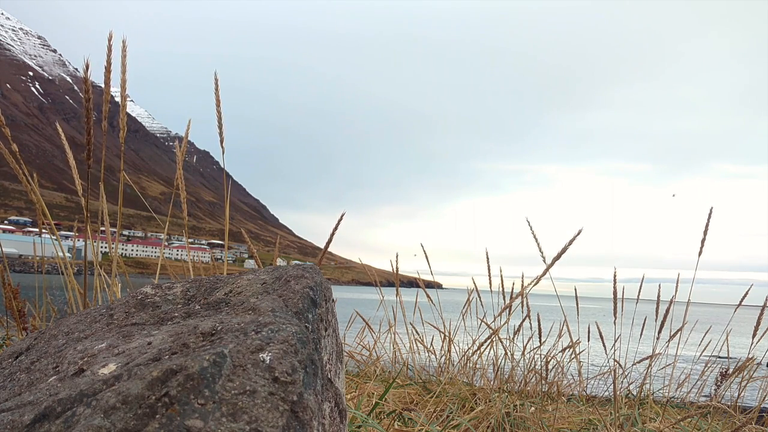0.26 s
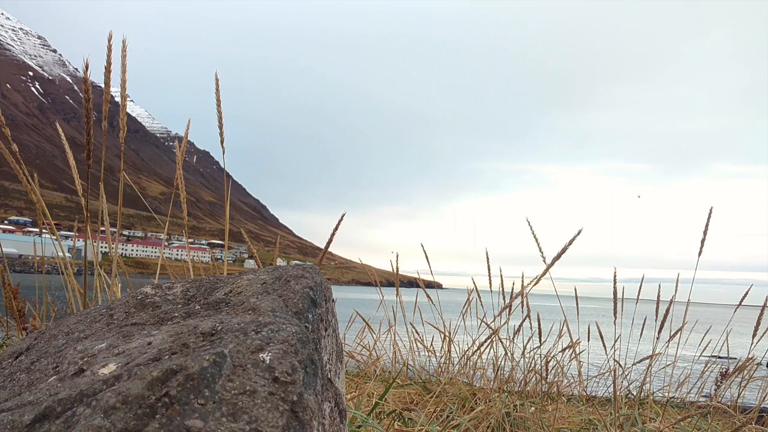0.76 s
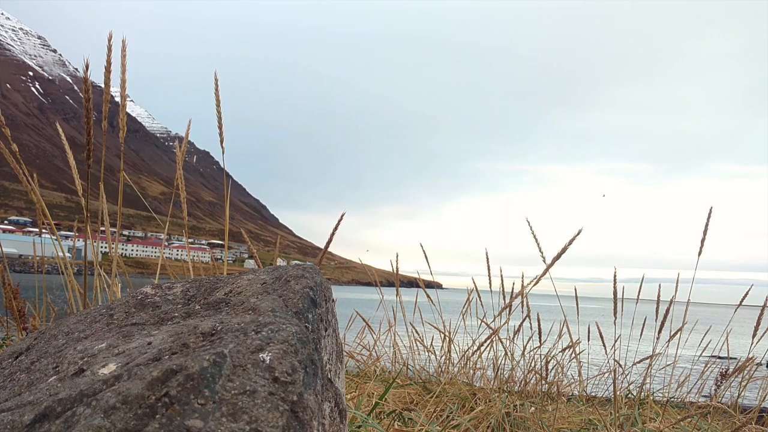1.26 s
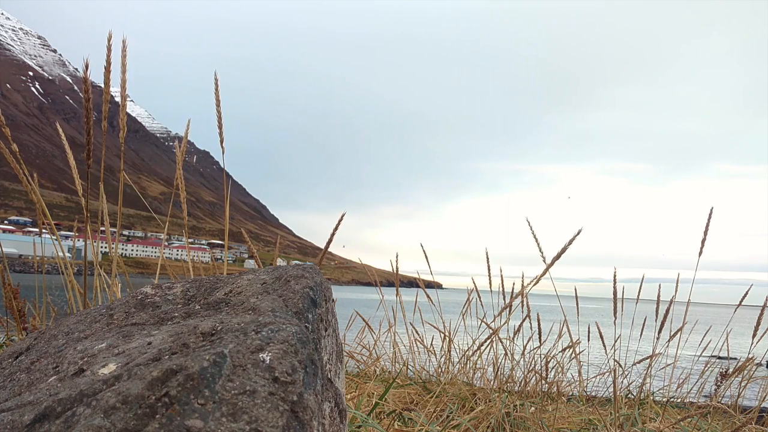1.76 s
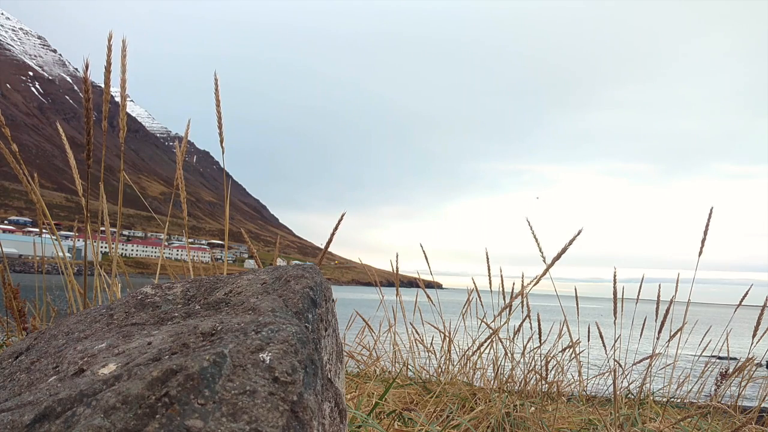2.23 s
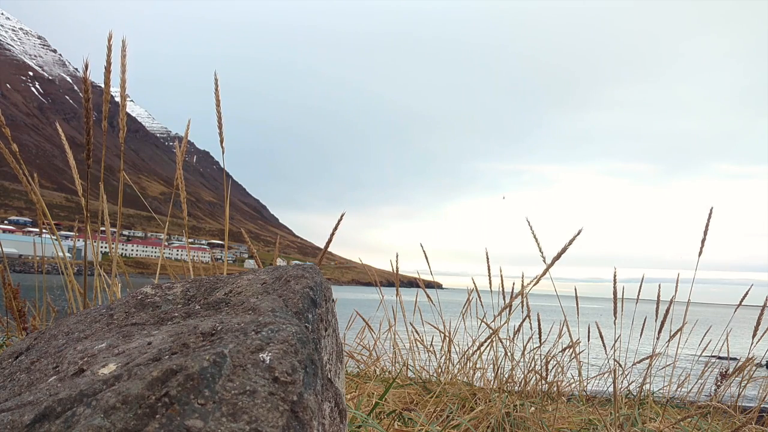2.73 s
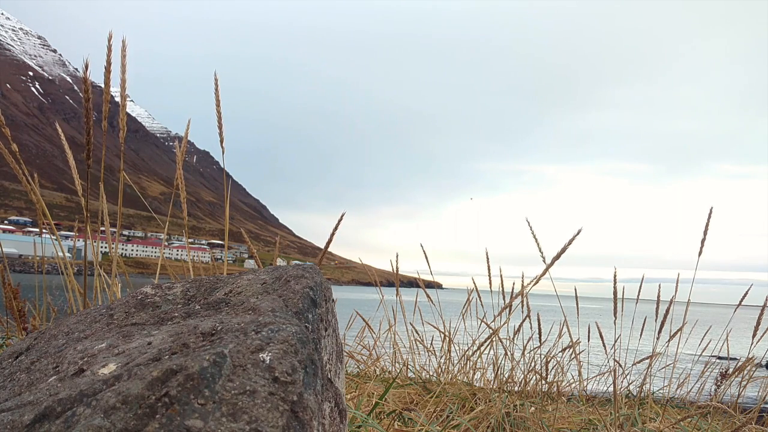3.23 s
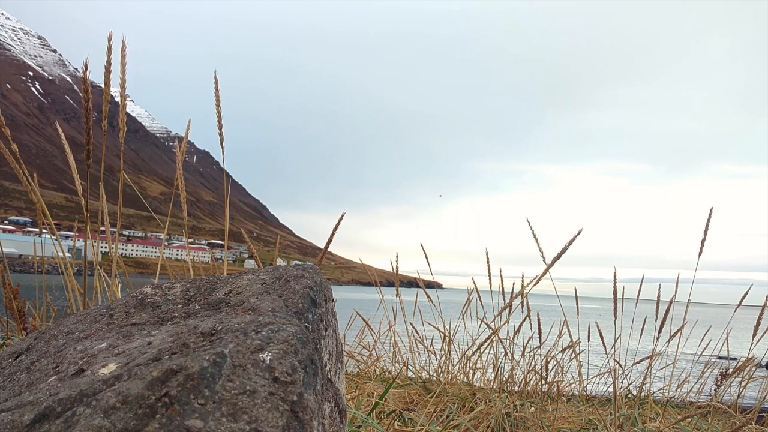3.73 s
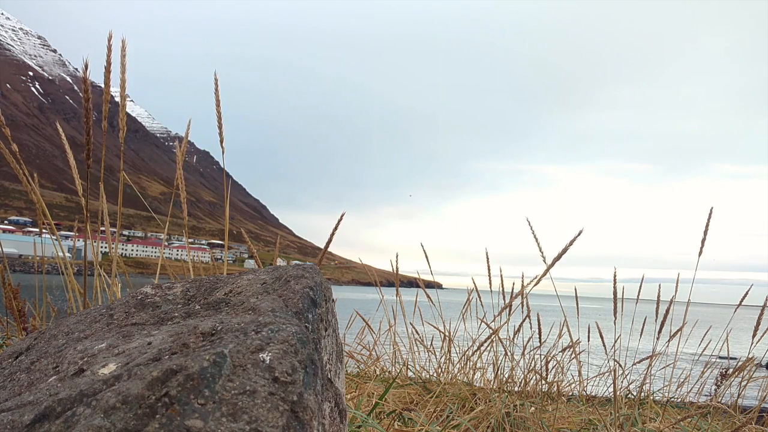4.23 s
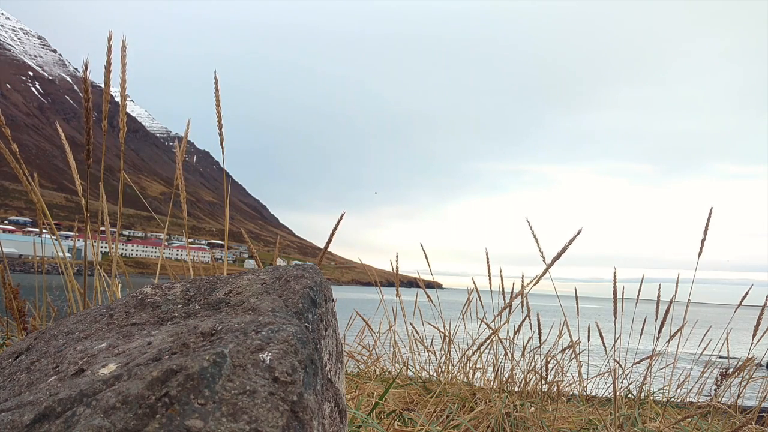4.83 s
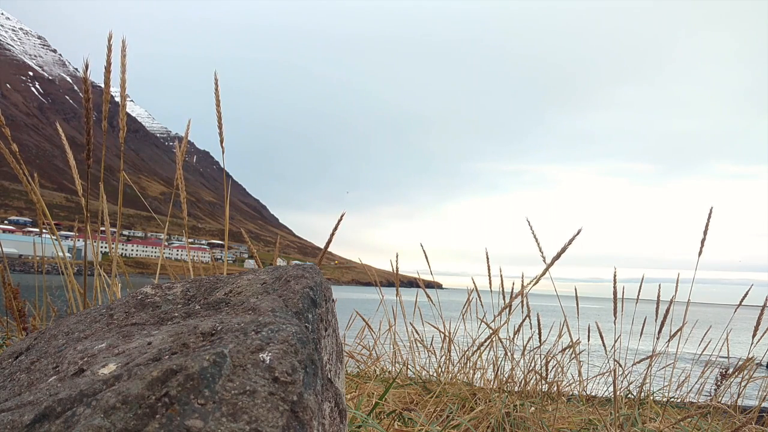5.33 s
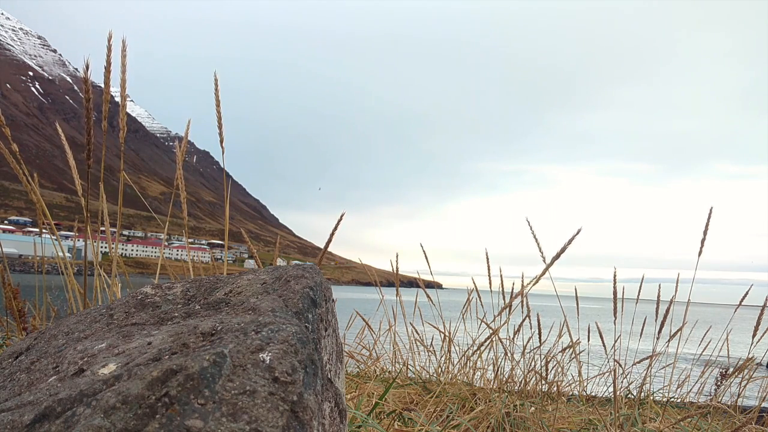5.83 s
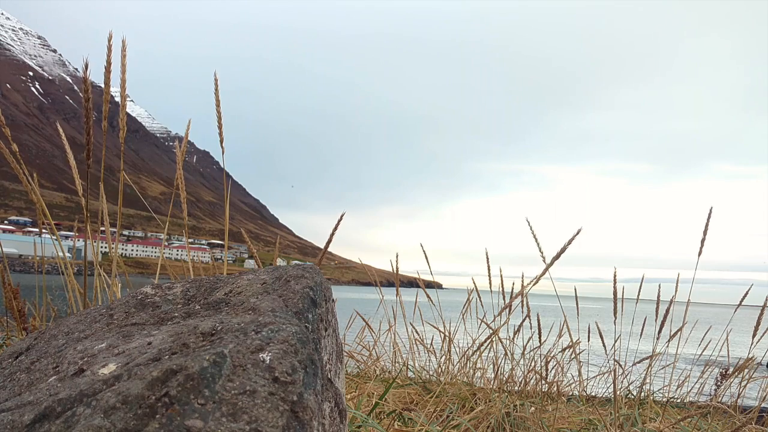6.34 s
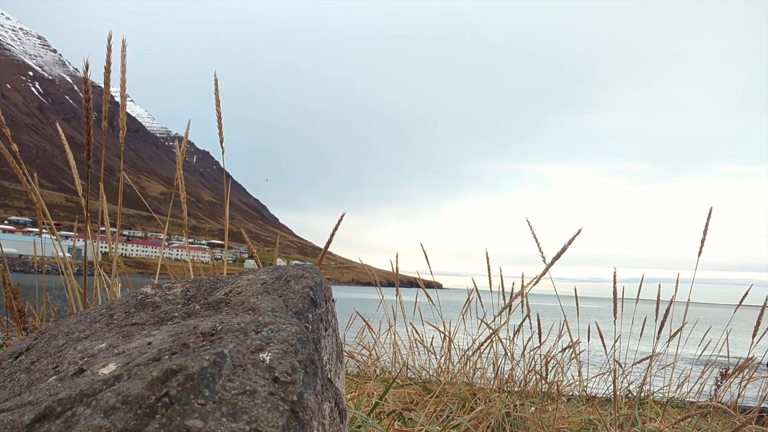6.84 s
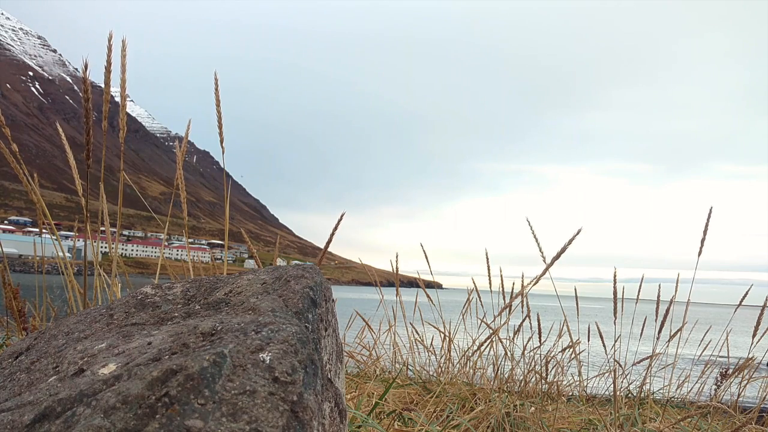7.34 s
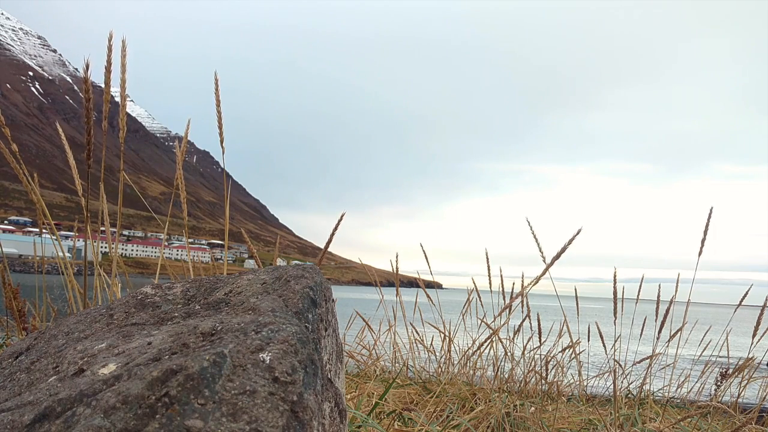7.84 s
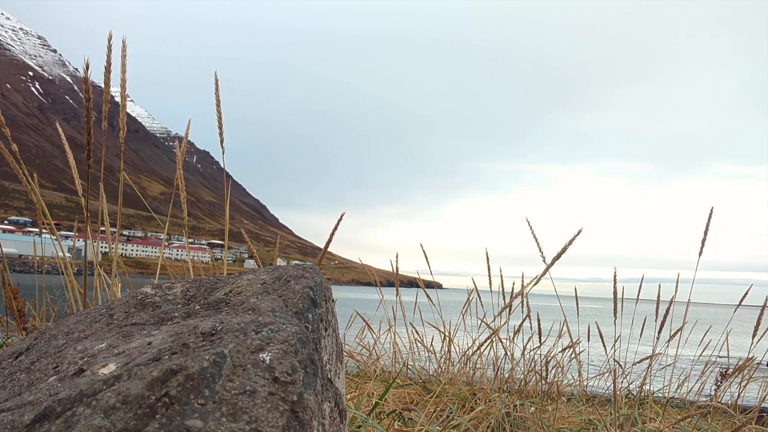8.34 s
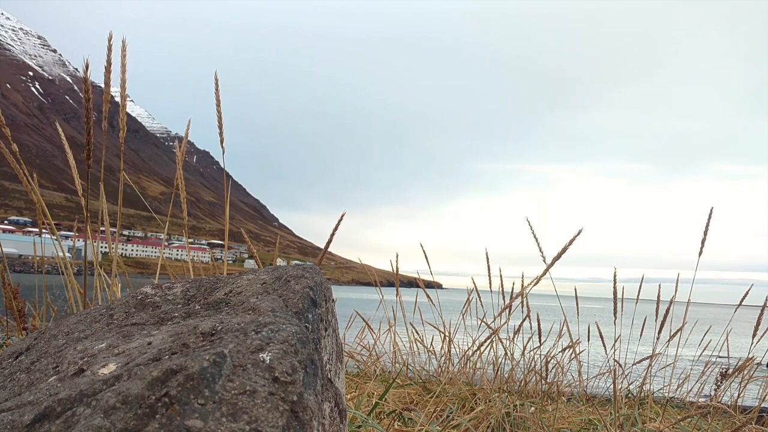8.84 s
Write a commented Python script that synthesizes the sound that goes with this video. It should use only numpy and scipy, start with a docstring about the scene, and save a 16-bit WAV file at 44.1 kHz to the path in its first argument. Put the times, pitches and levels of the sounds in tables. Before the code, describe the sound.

Outdoor stereo ambience on a grassy, rocky fjord shore. A near gull, left of center, repeats a quick pip and falling cry about every 0.7 seconds, speeding up and ending in low yelps late on. A second, duller gull answers without pips. Small waves wash and bubble, strongest around two seconds. Ship diesels throb low, wind rumbles on the microphone, and thin smeared echoes return.

```python
"""A grassy shore in a fjord harbour: two gulls call to each other above small waves washing over rocks.
Each cry is a harmonic tone shaped by a throat; the nearer bird puts a short pip before each falling cry,
and the shore answers with scattered, smeared echoes. The wash is noise in bands that swell with each wave,
with ringing bubbles on top. Ships' diesels throb and drone as steady tones, a faint motor sinks in pitch,
a few dry ticks sound, and a breeze rumbles on the microphone over its even hiss."""
import sys
import numpy as np
from scipy import signal
from scipy.fft import rfft, irfft, next_fast_len
from scipy.io import wavfile
from scipy.ndimage import uniform_filter1d

SR = 44100
rng = np.random.default_rng(int(sys.argv[2]) if len(sys.argv) > 2 else 0)


def pcm_store(signal):
    """Save signal as 16-bit PCM."""
    levels = np.round(np.clip(np.atleast_2d(signal), -1, 1) * 32767)
    wavfile.write(sys.argv[1], SR, levels.astype(np.int16).T)


N = 400869
TIME = np.arange(N) / SR  # s

# Calls of the near gull, a pip and then a cry. Each row: crest of the cry in seconds, lead of the pip
# before the crest in seconds, start of the cry after the crest in seconds, length of the fall in seconds,
# crest pitch in Hz, knee pitch in Hz, level before the breath in dB, brightness of the upper harmonics in dB.
NEAR_CALLS = [(0.418, 0.067, .01, .18, 1550, 1330, -36, -5.5),
              (1.142, 0.089, -0.004, 0.16, 1570, 1377, -32.5, -16.5),
              (1.84, 0.09, 0.014, 0.15, 1555, 1362, -35, -11.5),
              (2.554, .09, .018, 0.15, 1547, 1352, -39, -8.5),
              (3.235, 0.071, -0.037, .185, 1540, 1380, -38, -4),
              (3.869, .072, -0.024, .19, 1543, 1387, -38, -4),
              (4.568, .089, -0.034, 0.14, 1570, 1415, -39, .5),
              (5.233, .088, -.042, .18, 1596, 1382, -39.5, -1),
              (5.898, 0.088, -0.011, 0.21, 1607, 1377, -37, -0.5),
              (6.504, .073, .002, 0.2, 1577, 1366, -35, -1.5),
              (7.038, 0.064, -.025, 0.22, 1542, 1360, -38, 1),
              (7.583, 0.069, 0.021, 0.21, 1573, 1343, -39, 1.5),
              (8.094, 0.067, 0.022, 0.15, 1560, 1343, -39, 4.5),
              (8.596, 0.074, 0.0095, 0.21, 1572, 1338, -35, 2)]
# Cries of the far gull. Each row: crest in seconds, length of the fall in seconds, crest pitch in Hz,
# level before the breath in dB, brightness of the upper harmonics in dB.
FAR_CALLS = [(0.818, 0.23, 1655, -35, -0.5), (1.896, 0.24, 1617, -33.5, -4.5),
             (2.626, 0.26, 1615, -34.5, -9), (3.739, 0.22, 1595, -38, -6.5), (4.494, 0.3, 1597, -40, -8),
             (5.537, 0.23, 1615, -36.5, -11.5), (6.761, .225, 1637, -38.5, -2.5),
             (7.847, 0.14, 1650, -40.5, 0.5), (8.812, .2, 1657, -42.5, -2.5)]
# Low yelps closing the near gull's excited cries. Each row: start in seconds, length in seconds, level in dB.
YELPS = [(7.225, .032, -44), (7.749, 0.048, -38.5), (8.22, 0.07, -35.5), (8.787, 0.037, -38)]
# Growing excitement of the near gull. Each row: time in seconds, excitement from 0 to 1.
EXCITEMENT = [(6.5, 0), (7.04, .4), (7.58, .8), (8.09, 1)]
# Breath through a cry. Each row: time from the crest as a share of the fall, effort in dB.
NEAR_BREATH = [(-.3, -7), (0, -5), (.12, -1), (.32, 3.5), (.55, 2.5), (.8, -1.5), (1, -8)]
FAR_BREATH = [(-.3, -9), (0, -4), (.25, 4.5), (.5, 3), (.8, -.5), (1, -6)]
# Turning of each gull towards the shore. Each row: time in seconds, loss per upper harmonic in dB.
NEAR_DULLNESS = [(0.42, 4.5), (1.14, 0), (1.84, -9.5), (2.56, -4), (3.23, 2), (3.87, -5), (4.57, 0.5),
                 (6.2, 0.5), (8.7, -1)]
FAR_DULLNESS = [(0.8, 18), (8.8, 14)]
# Response of a gull's throat above the fundamental. Each row: frequency in Hz, gain in dB.
THROAT = [(2100, 6.5), (2750, 0), (3200, -1), (3650, -22), (4150, -11.5), (4550, -12.5), (4950, -30),
          (5600, -25.5), (6200, -52), (6800, -43), (7600, -42)]
# Waves breaking on the rocks. Each row: peak in seconds, strength over the calm wash in dB.
WAVES = [(0.05, 7.5), (0.45, 5.5), (1.65, 15), (2.3, 15.5), (3.0, -5), (3.7, 3), (4.55, -1), (7.4, 2),
         (8.3, 5), (9.1, 10.5)]
# Relative spectrum of the sea. Each row: frequency in Hz, density in dB per Hz.
SEA_COLOUR = [(100, -0.5), (135, -0.5), (230, -8.5), (360, -12), (480, -10), (700, -15), (1400, -14.5),
              (2100, -21), (3000, -26.5), (4200, -34), (5600, -40), (6800, -42.5), (10000, -52),
              (15500, -62)]
# Stereo width of the sea. Each row: frequency in Hz, side minus mid in dB.
SEA_WIDTH = [(120, -6), (260, -2.5), (500, 4), (1000, 2), (2000, -1.5), (5000, 2), (12000, -1)]
# Lines of the smaller engines and generators. Each row: frequency in Hz, peak level in dB.
DRONE = [(25.67, -36.5), (28.89, -40.5), (46.36, -30.5), (51.38, -31.5), (57.74, -46), (74.27, -33.5),
         (77.12, -31), (81.09, -42), (102.72, -43), (116.57, -57), (128.44, -43)]
# A faint far-off motor tone. Each row: time in seconds, pitch in Hz, mean level in dB.
FAR_MOTOR = [(3.8, 626, -72), (4.05, 612, -43.5), (4.4, 578, -44), (4.8, 568.5, -53), (5.401, 557, -44.5),
             (6.049, 549, -47), (6.3, 550, -72)]
# Faint dry ticks. Each row: start in seconds, initial level in dB.
TICKS = [(1.631, -36), (7.701, -40), (7.905, -44), (7.98, -44)]
# Relative spectrum of the wind rumble before its roll-off. Each row: frequency in Hz, density in dB per Hz.
WIND = [(18, -22), (26, 10.5), (35, -12.5), (47, 2.5), (60, -0.5), (72, 4.5), (90, -7), (115, -18)]

# After the quick drop to the knee a cry sags; its last pitch is a share of the knee
NEAR_END, FAR_END = .925, .893
FAR_KNEE = .868  # share of the crest pitch
FAR_RISE_S = .035
# At full excitement a cry droops: the pitch falls and the voice moves into its first harmonic
DROOP_S, DROOP_HZ, DROOP_FIRST_DB, DROOP_UPPER_DB = .05, 75.5, 15.5, -17
# A pip starts below the crest pitch (share), rises, and fills a share of the time before the crest
PIP_PITCH, PIP_RISE_HZ_PER_S, PIP_FILL = .915, 1790, 0.56
# Harmonics of a pip over those of its cry
PIP_FIRST_DB, PIP_SECOND_DB = 5.5, 0.5
# At full excitement a pip loses its rise, drops by this pitch and changes by this level
EXCITED_PIP_HZ, EXCITED_PIP_DB = 6.6, -5
YELP_HZ, YELP_SAG_HZ_PER_S, YELP_BRIGHT_DB = 1077, 420, -9
CATCH_S = .012  # the hoarse catch comes this long before a short note
SEA_DB = -34  # mid level before the swell
WAVE_RISE_S, WAVE_DRAIN_S = 0.32, 0.46
# Foam, splash and surge: level in the calm, and how much of a wave goes into the last two
FOAM_CALM_DB, SPLASH_CALM_DB, SURGE_CALM_DB = -5.5, -2.34, -0.43
SPLASH_SHARE_DB, SURGE_SHARE_DB = -9, -13.5
SURGE_LAG_S, SURGE_SPREAD_S = 0.44, 0.55
TOP_HZ = 15700


def undb(db):
    """Decibels to amplitude gain."""
    return 10 ** (np.asarray(db) / 20)


def unit(x):
    """Normalise the power: rms 1."""
    return x / np.sqrt(np.mean(x ** 2))


def at_hz(table, hz):
    """Spectral interpolation on a logarithmic frequency axis."""
    f, db = np.transpose(table)
    return np.interp(np.log(hz + 1), np.log(f), db)


def at_time(table, s):
    """Linear interpolation of a two-column table."""
    return np.interp(s, *np.transpose(table))


def walk(rate, size=N):
    """Smoothed random steps (rate in steps per s): a wander with a spread near 1."""
    k = max(int(SR / rate), 1)
    steps = np.repeat(rng.standard_normal(size // k + 1), k)
    return np.sqrt(2) * uniform_filter1d(uniform_filter1d(steps, k), k)[:size]


def noise(gain):
    """Spectral shaping: white noise filtered by gain(Hz), at rms 1."""
    size = next_fast_len(N, True)
    hz = np.fft.rfftfreq(size, 1 / SR)
    return unit(irfft(rfft(rng.standard_normal(size)) * gain(hz), size)[:N])


def add(track, s, sound):
    """Superposition: mix a sound into a track at time s."""
    i = int(np.clip(s * SR, 0, N))
    track[..., i:i + sound.shape[-1]] += sound[..., :N - i]


def place(x, left_db, lead_ms):
    """Interaural differences: a source to the left reaches the left port louder and sooner."""
    left = x * undb(left_db / 2)
    right = np.interp(TIME - lead_ms / 1000, TIME, x) * undb(-left_db / 2)
    return np.array([left, right])


def syrinx(hz, effort_db, first_db, second_db, dull_db, jitter, rasp):
    """Source and filter: an unsteady harmonic tone through the throat; harder breath lifts upper harmonics."""
    shimmer_db, attack_s, release_s = 1.7, .011, .007
    n = len(hz)
    unsteady_hz = hz * (1 + jitter * walk(136.6, n) + rasp * walk(900, n))
    phase = 2 * np.pi * np.cumsum(unsteady_hz) / SR
    levels = [first_db + 0.85 * effort_db]
    for k in range(2, 6):
        tilt_db = (k - 2) * (0.22 * effort_db - dull_db)
        levels.append(second_db + at_hz(THROAT, k * hz) + effort_db + tilt_db)
    tone = np.zeros(n)
    for k, db in enumerate(levels, 1):
        tone += undb(db + shimmer_db * walk(49.8, n)) * np.sin(k * phase)
    edge = np.minimum(TIME[:n] / attack_s, TIME[:n][::-1] / release_s)
    return np.sqrt(2) * tone * np.minimum(edge, 1)


def cry(start_s, fall_s, crest_hz, knee_hz, db, bright_db, dull_db, excited, breath, end,
        jitter, rasp, drop_s, closing_db, fade_db, waver, order):
    """Frequency glide: pitch arches over a crest, drops to a knee, then sags while the beak closes."""
    u = np.linspace(0, 1, int((fall_s - start_s) * SR))
    t = start_s + u * (fall_s - start_s)  # seconds from the crest
    arch = np.exp(-(t / np.where(t < 0, 2 * drop_s, drop_s)) ** 2)
    droop = excited * np.exp(-((fall_s - t) / DROOP_S) ** 2)
    sag_hz = knee_hz * (1 + (end - 1) * u ** order)
    hz = (crest_hz * arch + (1 - arch) * sag_hz) * (1 + waver * walk(42.5, len(u)))
    effort_db = at_time(breath, t / fall_s)
    first_db = db + fade_db * (.4 - u) + DROOP_FIRST_DB * droop
    upper_db = db + bright_db + closing_db * (.4 - u) + DROOP_UPPER_DB * droop ** 2
    return syrinx(hz - DROOP_HZ * droop ** 2, effort_db, first_db, upper_db, dull_db, jitter, rasp)


def pip(length_s, start_hz, glide, db, bright_db, dull_db=-1, jitter=0.0066, rasp=0.0053,
        arch_db=9, peak_db=2.5, catch_db=-8, catch_rasp=0.1174):
    """Onset of voicing: a short note gliding by so many Hz per s, just after a hoarse catch."""
    u = np.linspace(0, 1, int(length_s * SR))
    effort_db = peak_db - arch_db * (2 * u - 1) ** 2
    hz = start_hz + glide * length_s * u
    clear = syrinx(hz, effort_db, db, db + bright_db, dull_db, jitter, rasp)
    catch_effort_db = effort_db + catch_db * (u + 0.68)
    hoarse = syrinx(hz, catch_effort_db, db - 1, db + bright_db, dull_db + 1, jitter, catch_rasp)
    lag = int(CATCH_S * SR)
    return np.pad(clear, (lag, 0)) + np.pad(hoarse, (0, lag))


def near_gull():
    """Phrasing by arousal: a pip, then a falling cry; excited pips lose their rise and cries droop to a yelp."""
    out = np.zeros(N)
    for s, lead_s, start_s, fall_s, hz, knee_hz, db, bright_db in NEAR_CALLS:
        dull_db = at_time(NEAR_DULLNESS, s)
        excited = at_time(EXCITEMENT, s)
        pip_hz = PIP_PITCH * hz - EXCITED_PIP_HZ * excited
        rise = PIP_RISE_HZ_PER_S * (1 - excited)
        pip_db = db + PIP_FIRST_DB + EXCITED_PIP_DB * excited
        pip_bright_db = bright_db + PIP_SECOND_DB - PIP_FIRST_DB
        add(out, s - lead_s - CATCH_S, pip(PIP_FILL * lead_s, pip_hz, rise, pip_db, pip_bright_db))
        add(out, s + start_s, cry(start_s, fall_s, hz, knee_hz, db, bright_db, dull_db, excited,
                                  NEAR_BREATH, NEAR_END, jitter=.0035, rasp=0.0024, drop_s=.034,
                                  closing_db=5, fade_db=8, waver=0.00303, order=2))
    for s, length_s, db in YELPS:
        add(out, s - CATCH_S, pip(length_s, YELP_HZ, -YELP_SAG_HZ_PER_S, db, YELP_BRIGHT_DB))
    return out


def far_gull():
    """Weakened upper harmonics: the answering bird gives slower, duller cries with no pip."""
    out = np.zeros(N)
    for s, fall_s, hz, db, bright_db in FAR_CALLS:
        dull_db = at_time(FAR_DULLNESS, s)
        add(out, s - FAR_RISE_S, cry(-FAR_RISE_S, fall_s, hz, FAR_KNEE * hz, db, bright_db, dull_db, 0,
                                     FAR_BREATH, FAR_END, jitter=0.0038, rasp=0.0034, drop_s=.042,
                                     closing_db=15.5, fade_db=2.5, waver=0.0035, order=1))
    return out


def shore(x, t60=0.87, tail_db=-17, echo_s=.28, echo_db=-24, smear_s=0.056):
    """Scattering and reflection: rocks give a thin tail; the harbour front returns a smeared echo."""
    t = TIME[:SR]
    tail = undb(-60 * t / t60) * (t > .01)
    echo = np.exp(-((t - echo_s) / smear_s) ** 2)
    envelope = undb(tail_db) * unit(tail) + undb(echo_db) * unit(echo)
    response = rng.standard_normal((2, SR)) * envelope / np.sqrt(SR)
    return signal.fftconvolve(x[None], response, axes=1)[:, :N]


def gulls():
    """Direct and reflected sound: both birds stand to the left, and the shore returns their calls."""
    near, far = near_gull(), far_gull()
    direct = undb(1.5) * (place(near, 4.2, .29) + place(far, 4.2, .2))
    return direct + shore(near + far)


def sea_swell():
    """Build-up and drainage: surge, splash and foam in dB; the heavy surge follows late and blurred."""
    power = np.zeros(N)
    for s, db in WAVES:
        t = TIME - s
        power += undb(db) ** 2 * np.exp(-np.where(t < 0, (t / WAVE_RISE_S) ** 2, t / WAVE_DRAIN_S))
    backwash = uniform_filter1d(np.interp(TIME - SURGE_LAG_S, TIME, power), int(SURGE_SPREAD_S * SR))
    surge = SURGE_CALM_DB + 10 * np.log10(1 + undb(SURGE_SHARE_DB) ** 2 * backwash)
    splash = SPLASH_CALM_DB + 10 * np.log10(1 + undb(SPLASH_SHARE_DB) ** 2 * power)
    foam = FOAM_CALM_DB + 10 * np.log10(1 + power)
    return [surge, splash, foam]


def wash(churn_db=1.2, left_db=1, foam_left_db=2.5, surge_hz=450, splash_hz=2200, foam_hz=6500, count=18):
    """Turbulent noise: surge moves the lows, splash the middle, foam, more to the left, the treble."""
    swell = sea_swell()
    size = next_fast_len(N, True)
    hz = np.fft.rfftfreq(size, 1 / SR)
    mid, side = rfft(rng.standard_normal((2, size))) * undb(at_hz(SEA_COLOUR, hz))
    width = undb(at_hz(SEA_WIDTH, hz))
    ports = np.array([mid + width * side, mid - width * side]) * (hz > 95)
    scale = undb(SEA_DB) / irfft(mid * (hz > 95), size).std()
    left_right = np.array([[1], [-1]])
    centres = np.log([surge_hz, splash_hz, foam_hz])
    edges = np.geomspace(80, 16000, count + 1)
    out = np.zeros((2, N))
    for lo, hi in zip(edges, edges[1:]):
        shares = [np.interp(np.log(lo * hi) / 2, centres, row) for row in np.eye(len(swell))]
        # each band churns alone
        db = sum(share * part for share, part in zip(shares, swell)) + churn_db * walk(15)
        in_band = (hz >= lo) & (hz < hi)
        band = irfft((ports * in_band).astype(np.complex64), size)[:, :N]
        out += band * undb(db) * undb(left_right * foam_left_db * shares[-1] / 2)
    return scale * out * undb(left_right * left_db / 2)


def bubbles(low_hz, high_hz, cycles, db, spread_db, count):
    """Damped resonance: bursting bubbles and drops ring briefly, rising, louder when a wave breaks."""
    splash = sea_swell()[1]
    out = np.zeros((2, N))
    for when, pitch, size, pan in rng.random((count, 4)):
        hz = low_hz * (high_hz / low_hz) ** pitch
        u = np.linspace(0, 1, int(2 * cycles * SR / hz) + 2)
        ring = np.sin(4 * np.pi * cycles * u * (1 + 0.046 * u)) * np.exp(-np.log(200) * u)
        # a few are much louder than most
        loud_db = db + splash[int(when * (N - 1))] - spread_db * np.log(max(1 - size, .01))
        gain = undb(loud_db) * (low_hz / hz) ** 0.19
        add(out, when * N / SR, np.sqrt([[pan], [1 - pan]]) * ring * gain)
    return out


def water():
    """Superposition of noise and rings: the wash with its gurgles and fine spray."""
    gurgle = bubbles(450, 2500, cycles=9, db=-46, spread_db=1.5, count=700)
    spray = bubbles(2500, 12000, cycles=3, db=-45, spread_db=2.5, count=1500)
    return wash() + gurgle + spray


def harbour(diesel_db=-20.0, waver=0.27, whine_db=-50, upper_whine_db=-55):
    """Amplitude modulation: an eight-cylinder diesel throbs once per engine cycle, amid drones and a whine."""
    firing_hz, throb_s, depth = 40.54, .042, .72
    whine_hz, upper_whine_hz = 664, 695  # two close tones of one machine
    throb = 1 + depth * np.cos(2 * np.pi * firing_hz / 8 * (TIME - throb_s))
    firing = np.sin(2 * np.pi * firing_hz * TIME + 0.3 * walk(3.22))
    diesel = throb * firing * undb(diesel_db + .5 * walk(4.15))
    drone = np.zeros(N)
    for hz, db in DRONE:
        drone += undb(db) * np.sin(2 * np.pi * (hz * TIME + rng.random()) + waver * walk(2.024))
    lower = undb(whine_db + 2 * walk(3.05)) * np.sin(2 * np.pi * whine_hz * TIME + 1.0 * walk(6.7))
    upper = undb(upper_whine_db + 2 * walk(3)) * np.sin(2 * np.pi * upper_whine_hz * TIME + 1.1 * walk(6))
    return place(diesel, 2, .1) + place(drone + lower + upper, .5, .1)


def far_motor():
    """Frequency and amplitude modulation: a distant motor swells and sinks in pitch."""
    s, hz, db = np.transpose(FAR_MOTOR)
    pitch_hz = np.interp(TIME, s, hz) * (1 + 0.01196 * walk(40))
    phase = 2 * np.pi * np.cumsum(pitch_hz) / SR
    level_db = np.interp(TIME, s, db) + 3.2 * walk(14)
    return place(np.sin(phase) * undb(level_db), 1, .1)


def ticks(lo_hz=3300, hi_hz=4700, t60=0.091):
    """Exponential decay: small dry ticks of band noise die away at once."""
    out = np.zeros(N)
    t = TIME[:SR // 10]
    band = signal.butter(2, [lo_hz, hi_hz], "bandpass", fs=SR, output="sos")
    for s, db in TICKS:
        burst = unit(signal.sosfilt(band, rng.standard_normal(len(t))))
        add(out, s, burst * undb(db - 60 * t / t60))
    return place(out, 3, 0.28)


def wind(db=-32, gust_db=2.0, apart_db=-9):
    """Turbulent pressure: low buffeting on the microphone, partly different at the two ports."""
    def rumble(hz):
        return undb(at_hz(WIND, hz)) / (1 + (hz / 150) ** 6)
    mid = noise(rumble)
    side = noise(rumble) * undb(apart_db)
    return np.array([mid + side, mid - side]) * undb(db + gust_db * walk(2.93))


def hiss(db=-64):
    """White noise: even microphone hiss under the foam, independent at each port."""
    return undb(db) * rng.standard_normal((2, N))


def scene():
    """Superposition of everything that reaches the microphone on the shore, with its hiss."""
    return gulls() + water() + harbour() + far_motor() + ticks() + wind() + hiss()


def record(dry):
    """Band limiting: the recorder cuts the top with a steep low-pass."""
    return signal.sosfilt(signal.ellip(10, .2, 80, TOP_HZ, fs=SR, output="sos"), dry)


dry = scene()
out = record(dry)
pcm_store(out)
```